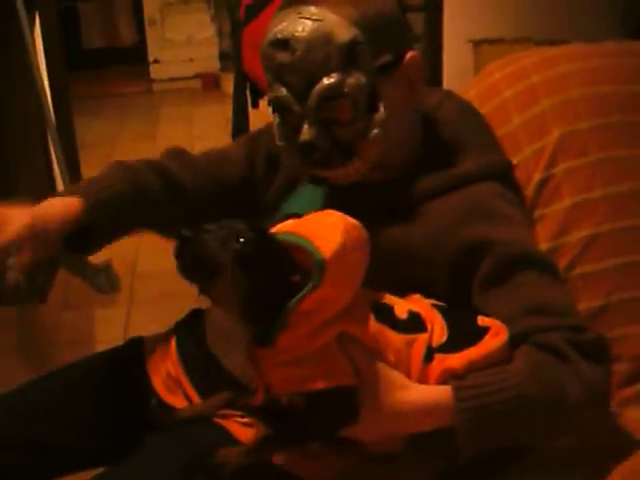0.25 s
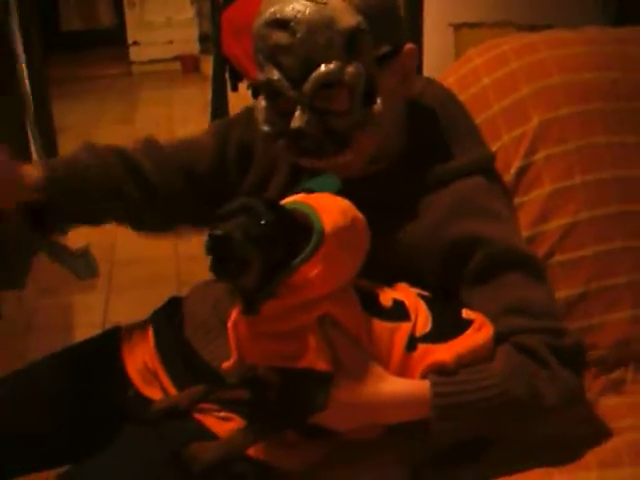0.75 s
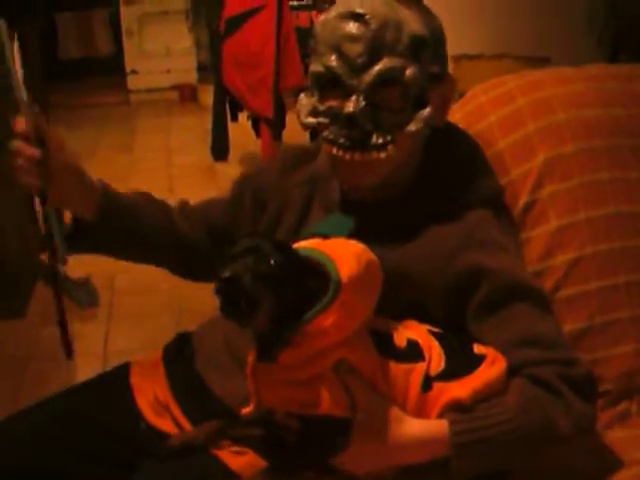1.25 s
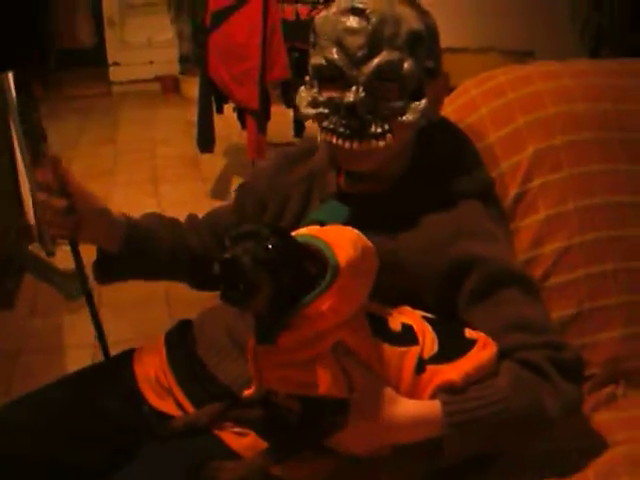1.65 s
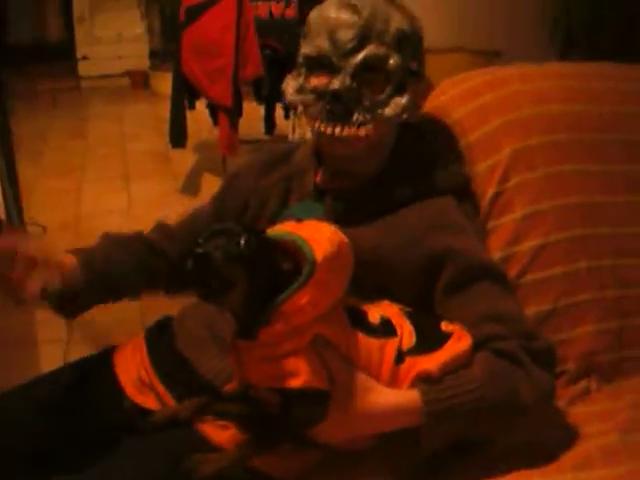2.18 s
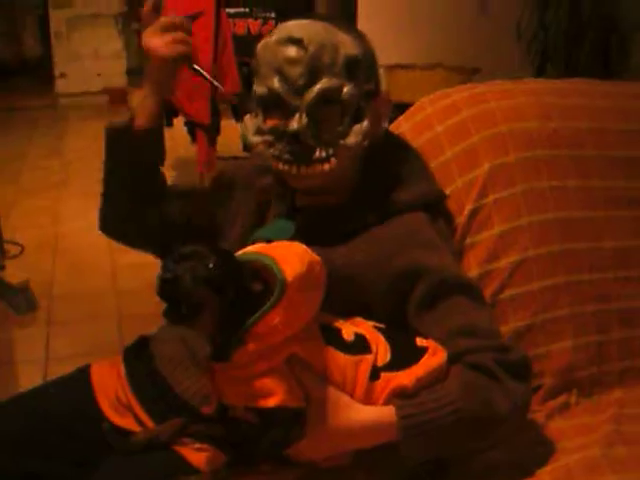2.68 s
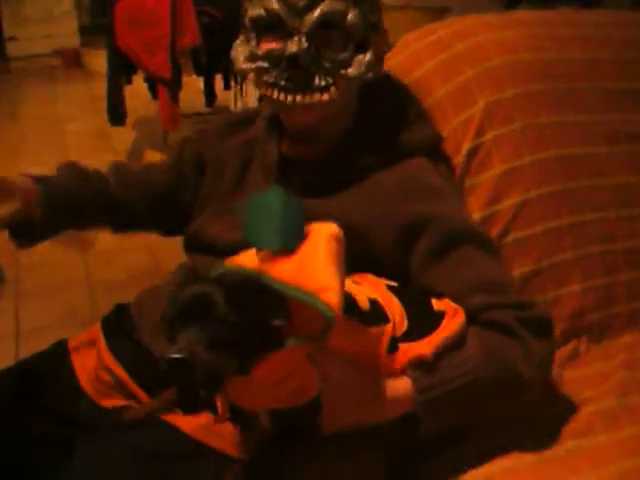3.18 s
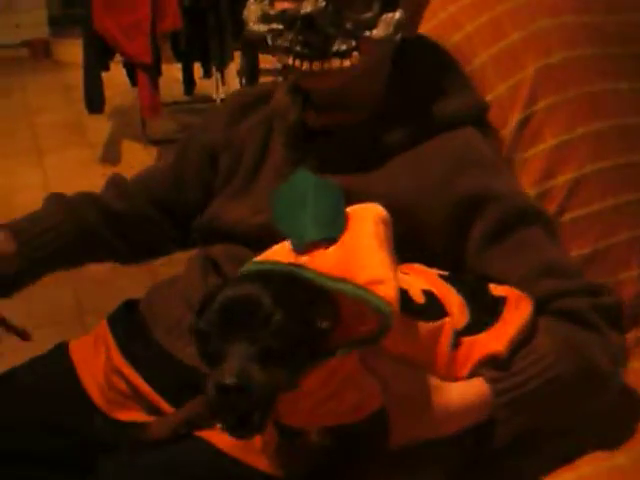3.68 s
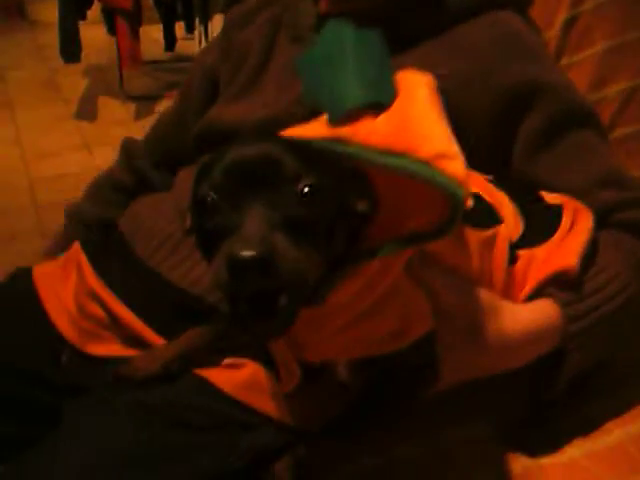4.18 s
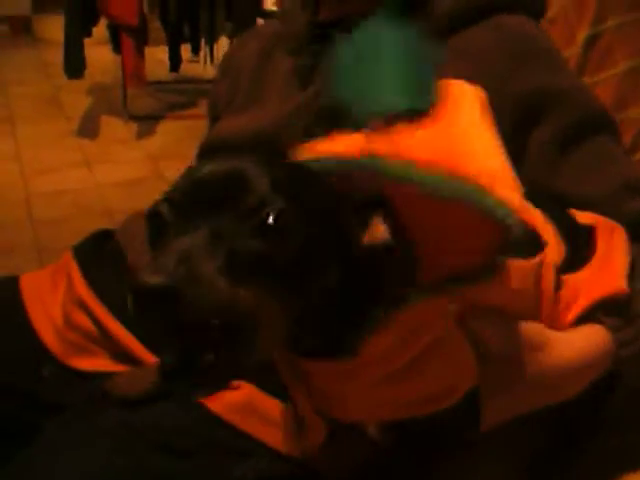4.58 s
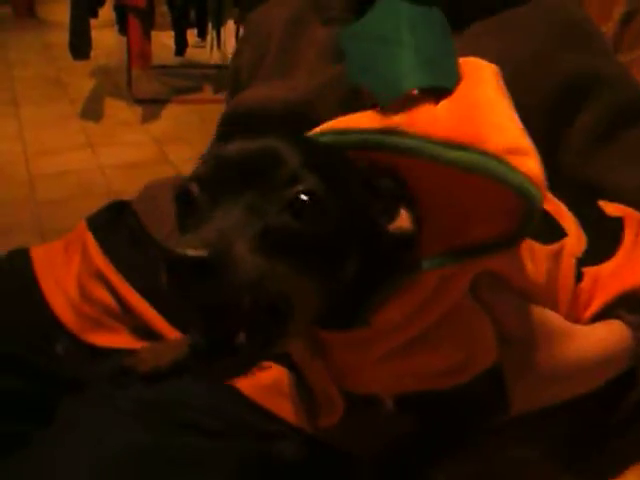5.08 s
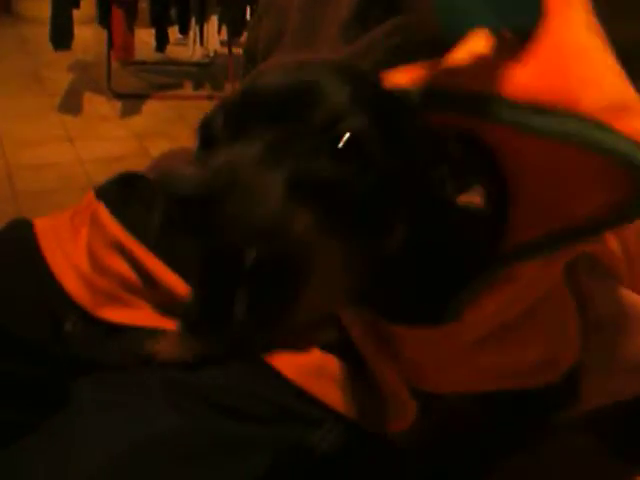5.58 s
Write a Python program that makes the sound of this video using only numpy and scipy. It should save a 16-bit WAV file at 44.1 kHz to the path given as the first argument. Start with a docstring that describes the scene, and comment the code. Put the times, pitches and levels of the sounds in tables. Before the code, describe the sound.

Close indoors, a small dog alternates rattling growls and rasping in-breath snarls, broken by short, slightly distorted barks and huffs.

```python
"""A small dog growling on a lap indoors.

Uneven vocal-fold pulses and turbulent air excite the resonances of throat and muzzle. Throbbing growls
on the out-breath alternate with raspy snarls on the in-breath, with snapping barks and huffs between.
The loudest crests overload a close, cheap microphone, which flattens and flips them into a crackle."""
import sys
import numpy as np
from scipy import signal
from scipy.fft import rfft, irfft, next_fast_len
from scipy.io import wavfile
from scipy.ndimage import uniform_filter1d

SR = 44100
rng = np.random.default_rng(int(sys.argv[2]) if len(sys.argv) > 2 else 0)


def store_wav(level_fs):
    """Save 16-bit WAV to argv[1]."""
    pcm = np.round(np.clip(np.atleast_2d(level_fs), -1, 1) * 32767)
    wavfile.write(sys.argv[1], SR, pcm.T.astype(np.int16))


N = 257536
TIME = np.arange(N) / SR


def amp(db):
    """Amplitude ratio of a level in decibels."""
    return 10 ** (np.asarray(db) / 20)


def unit_rms(x):
    """Normalisation to rms 1."""
    return x / np.sqrt(np.mean(x ** 2) + 1e-20)


def follow(rows, t):
    """Linear interpolation of each later column against the first."""
    knots, *columns = np.transpose(rows)
    return [np.interp(t, knots, column) for column in columns]


def add(mix, t, sound, fade=0.002):
    """Superposition: a sound joins the mix with tapered ends."""
    part = mix[max(round(t[0] * SR), 0):][:len(sound)]
    taper = np.clip(np.minimum(t - t[0], t[-1] - t) / fade, 0, 1)
    part += (sound * taper)[:len(part)]


def wander(t, hz):
    """Low-passed noise: smooth random motion of rms about 1."""
    f = np.fft.rfftfreq(N, 1 / SR)
    return unit_rms(irfft(rfft(rng.standard_normal(N)) / (1 + (f / hz) ** 4), N))[:len(t)]


def lowpass(x, hz, taps=511):
    """Zero-phase low-pass filtering."""
    return signal.oaconvolve(x, signal.firwin(taps, hz, window=("kaiser", 8), fs=SR), "same")


def envelope(x, window):
    """Magnitude of the analytic signal, averaged over a window of samples."""
    analytic = signal.hilbert(x, next_fast_len(len(x)))[:len(x)]
    return uniform_filter1d(abs(analytic), window) + 1e-6


def resonate(x, hz, width):
    """Forced response of a steep resonance whose frequency may move; rms 1."""
    carrier = np.exp(2j * np.pi * np.cumsum(hz * np.ones(len(x))) / SR)
    pole = np.exp(-np.pi * width / SR)
    return unit_rms((carrier * signal.lfilter([1], [1, -2 * pole, pole * pole], x / carrier)).real)


def ring(x, modes):
    """Modal sum: fixed resonances driven in parallel."""
    return sum(amp(db) * resonate(x, hz, width) for hz, width, db in modes)


def sing(t, hz, waver):
    """Random frequency modulation: a hard-driven resonance sounds as an unsteady tone."""
    return unit_rms(np.sin(2 * np.pi * np.cumsum(hz * (1 + waver * wander(t, 72.1))) / SR))


def steadied(x, amount, window):
    """Compression: saturating tissue holds the swing of a vibration nearer one size."""
    return unit_rms(x / envelope(x, window) ** amount)


def folds(t, hz, jitter, rough, puff=0.83):
    """Glottal source: uneven closures of the vocal folds, each with a puff of turbulent air."""
    cycles = np.cumsum(hz * np.exp(jitter * wander(t, 110))) / SR
    pulses = np.diff(np.floor(cycles), prepend=0)
    air = np.exp(-(cycles % 1) / puff) * rng.standard_normal(N)[:len(t)]
    return (1 - rough) * unit_rms(pulses - pulses.mean()) + rough * unit_rms(air)


# Low and high tract resonances. Each row: frequency in Hz, width in Hz, relative level in dB.
SNARL_BODY_MODES = [(268, 140, -20), (694, 120, -14.5), (1310, 380, -10)]
SNARL_RASP_MODES = [(2312, 450, -18), (2623, 513, 0), (3016, 600, -2.5), (3470, 465, -6.5),
                    (3746, 390, -10)]
# Snarls. Each row: start, attack, length and release in seconds, effort and rasp in dB,
# first resonance in Hz.
SNARL_BREATHS = [(0.0, 0.00068, 0.092, 0.089, -13, -15.5, 1157), (3.055, .05, 0.48, 0.12, -16, -16, 1171),
                 (4.655, 0.0052, 0.6785, 0.1, -14, -15.5, 1166), (5.615, 0.02, 0.31, .05, -13.5, -16, 1161)]


def snarl(start, attack, length, release, effort_db, rasp_db, first_hz, sag_hz_per_s=80):
    """Source and filter: a rattling in-breath past bared teeth, coloured by quivering lips."""
    t = np.arange(start, start + length, 1 / SR)
    onset = amp(-8 * np.maximum(1 - (t - start) / attack, 0))
    dying = np.maximum(1 - (t[-1] - t) / release, 0)
    drive = folds(t, hz=191, jitter=0.35, rough=0.71, puff=0.72)
    lips = 1 + 0.014 * wander(t, 12)
    first = resonate(drive, first_hz - sag_hz_per_s * (t - start), 180)
    body = amp(-1.44) * steadied(first, amount=0.25, window=500) + ring(drive, SNARL_BODY_MODES)
    rasp = sum(amp(db) * resonate(drive, hz * lips, width) for hz, width, db in SNARL_RASP_MODES)
    rasp = steadied(rasp, amount=0.9, window=900)
    voice = amp(effort_db - 19 * dying) * body + amp(rasp_db - 21 * dying) * rasp
    flutter = unit_rms(amp(1.3 * wander(t, 70)))
    return t, onset * voice * flutter


# Open-mouth resonances. Each row: frequency in Hz, width in Hz, relative level in dB.
BARK_MODES = [(1495, 664, 2), (2043, 335, 0), (2844, 1100, -0.5), (3400, 900, -13.5)]
# Barks. Each row: start, rise and length in seconds, level and its change over the length in dB,
# first resonance in Hz, brightness in dB.
BARKS = [(0.081, 0.0059, 0.14, 0, -1, 1175, -1.5), (0.521, 0.0026, 0.055, -18, -2.5, 976, -13.5),
         (0.772, 0.0013, 0.088, 0.5, -8, 957, -11.5), (2.802, 0.055, .12, 2, -9, 1180, -3),
         (3.509, 0.0054, 0.031, -6, -5, 1100, -6), (3.541, 0.0048, 0.1104, 1.5, -4.5, 1068, -7),
         (4.338, 0.051, 0.14, -3, -4, 1138, 1.5), (4.657, 0.004, 0.062, -9.5, 1.5, 1152, 4),
         (5.332, 0.001, 0.14, 1.5, -3, 1202, -2.5), (5.61, 0.017, 0.087, -3.5, -9, 1234, -6.5)]


def bark(start, rise, length, db, change_db, first_hz, bright_db, release=0.03):
    """Transient excitation: a hoarse burst drives the broad resonances of a mouth thrown open."""
    t = np.arange(start, start + length, 1 / SR)
    drive = folds(t, hz=268.7, jitter=0.3, rough=0.732, puff=0.43)
    voice = resonate(drive, first_hz, 340) + amp(bright_db) * ring(drive, BARK_MODES)
    voice = steadied(voice, amount=0.76, window=400)
    shape = np.minimum((t - start) / rise, 1) * np.minimum((t[-1] - t) / min(release, length / 2), 1)
    return t, amp(db + change_db * (t - start) / length) * shape * voice


# Low tract resonances. Each row: frequency in Hz, width in Hz, relative level in dB.
HUFF_MODES = [(288, 160, -34), (830, 190, -8)]
# Huffs. Each row: start and length in seconds, effort and level change over the length in dB,
# first resonance in Hz, levels of the second resonance and the hiss in dB.
HUFF_BREATHS = [(0.216, 0.35, -26, -19.5, 1154, -22.5, -29), (0.514, 0.3, -36.5, -33, 973, -38, -27.5),
                (2.985, 0.088, -26.5, -0.5, 1120, -24.5, -36.5), (4.544, .115, -29, 2, 1062, -30.5, -31.5),
                (5.457, 0.2, -28, -2.5, 1200, -27.5, -25)]


def huff(start, length, effort_db, change_db, first_hz, second_db, hiss_db):
    """Turbulence noise: breath filtered by the open muzzle, mostly fading as the air runs out."""
    t = np.arange(start, start + length, 1 / SR)
    air = rng.standard_normal(N)[:len(t)] * amp(1.1 * wander(t, 120))
    thin_air = signal.sosfilt(signal.butter(1, 800, "high", fs=SR, output="sos"), air)
    body = amp(2) * resonate(thin_air, first_hz, 330) + ring(air, HUFF_MODES)
    second = resonate(thin_air, 1964, 540)
    hiss = resonate(thin_air, 2690, 1300) + amp(-18.5) * resonate(thin_air, 3550, 950)
    shape = amp(change_db * ((t - start) / length) ** 2.25)
    return t, shape * (amp(effort_db) * body + amp(second_db) * second + amp(hiss_db) * hiss)


# Evenness of the throb. Each row: time in seconds, regularity from 0 to 1.
THROB_REGULARITY = [(0.92, 0), (1.02, 0.81), (1.33, 0.23), (1.45, 0.2), (2.52, 0.21), (2.64, 0.91),
                    (2.8, 0.11)]


def tissue_throb(t, rate_hz=26.3, crest_s=1.005):
    """Amplitude modulation by loose throat tissue, part periodic, part random: gain and regularity."""
    regular = np.clip(follow(THROB_REGULARITY, t)[0], 0, 1)
    periodic_db = 8.5 * np.cos(2 * np.pi * rate_hz * (t - crest_s))
    random_db = 6.5 * wander(t, 65)
    throb = amp(regular * periodic_db + (1 - regular) * random_db)
    throb /= np.sqrt(uniform_filter1d(throb ** 2, size=3400))
    return 2.11 * np.tanh(throb / 2.23), regular  # the tissue can swing only so far


# Fixed resonances of chest, throat and muzzle. Each row: frequency in Hz, width in Hz,
# relative level in dB.
GROWL_BODY_MODES = [(590, 120, -27), (740, 110, -16), (1230, 220, -17)]
GROWL_UPPER_MODES = [(2670, 680, -30)]
# Throat and mouth shape, one curve a growl. Each row: time in seconds, first three resonances in Hz.
FORMANT_PATHS = [
    [(0.87, 998.7, 1630, 2580), (0.94, 921, 1672, 2650), (1.2, 897.8, 1642, 2590),
     (1.532, 986.4, 1711, 2746), (1.64, 948.8, 1707, 2740), (2.108, 974.3, 1796, 2845),
     (2.156, 1029, 1823, 2910), (2.564, 947.5, 1760, 2966), (2.82, 997.6, 1800, 2780)],
    [(3.64, 1064, 2005, 3020), (3.688, 1050, 2016, 3100), (3.75, 1043, 1926, 2920),
     (4.21, 987.3, 1909, 2900), (4.44, 1150, 2000, 2890)],
]
# Growls, each swelling into a bark. Each row: start, build-up, swell and climax time in seconds,
# effort and brightness in dB, pitch in Hz when the first resonance lies at 1000 Hz.
GROWL_BREATHS = [(0.8, 0.15, 0.1, 2.84, -11.5, -7, 277.2), (3.55, 0.081, 0.15, 4.385, -12.5, -4.5, 243.3)]


def growl(start, build, swell, climax, level_db, bright_db, base_hz, formants, open_s=0.16, tail_s=0.17):
    """Modulated formants: on an out-breath through a nearly shut mouth, the lowest two almost sing."""
    t = np.arange(start, climax + tail_s, 1 / SR)
    stages = [start, start + build, climax - swell, climax, climax + open_s]
    effort_db = level_db + np.interp(t, stages, [-2, 0, 0, 4.5, -15])
    opened = np.clip((t - climax) / open_s, 0, 1)
    first_hz, second_hz, third_hz = follow(formants, t)
    pitch_hz = base_hz * (first_hz / 1000) ** 1.7  # a tighter throat raises both
    drive = folds(t, pitch_hz, jitter=0.085, rough=0.48 - 0.05 * opened)
    throb, regular = tissue_throb(t)
    bend = 1 + 0.028 * (throb - 1)  # each throb bends the singing formants upward
    first = sing(t, first_hz * bend, waver=0.029) + 0.75 * resonate(drive, first_hz * bend, 170)
    first = steadied(first, amount=0.6, window=300)
    second = 0.5 * sing(t, second_hz * bend, waver=0.019) + 0.88 * resonate(drive, second_hz, 240)
    third = amp(-4.5) * resonate(drive, third_hz, 380)
    fourth = amp(-13) * resonate(drive, third_hz + 724, 290)
    upper = steadied(second + third + fourth + ring(drive, GROWL_UPPER_MODES), amount=0.23, window=700)
    upper *= amp(bright_db - 6.5 * regular + 11 * opened)  # darker when even, brighter when open
    chest = amp(-20.5) * (0.74 * sing(t, pitch_hz, waver=0.07) + 0.67 * resonate(drive, pitch_hz, 130))
    voice = first * throb + (chest + ring(drive, GROWL_BODY_MODES) + upper) * throb ** 0.54
    return t, amp(effort_db) * voice


# The hardest single throbs. Each row: time in seconds, peak of the low band in dB.
HARD_THROBS = [(.969, 2), (.992, 2.5), (1.081, 1.5), (1.236, 0.8), (1.347, 0.5), (1.445, 1.5), (1.595, 1.5),
               (1.635, 1.5), (1.66, 1.7), (1.785, 2.6), (1.841, 0.5), (1.959, 0.9), (2.096, -0.5),
               (2.232, 0), (2.26, -0.5), (2.31, 0), (2.383, 1), (3.326, -3.5), (3.438, -14), (3.517, 6.5),
               (3.68, 4), (4.06, .5), (4.079, 2), (4.294, 3), (4.334, 1.5), (4.686, 5.5), (4.842, -1.5),
               (5.18, 1.7), (5.626, 3), (5.676, 2.5), (5.745, 0.5), (5.783, 2)]


def surge(voice, width_s=0.002, chance_per_s=3, lesser_db=-7.5, loud_db=-15.5):
    """Gaussian gain pulses lift the first-resonance band at set times, and by chance while it is loud."""
    low_band = lowpass(voice, 1400)
    size = envelope(low_band, window=40)
    by_chance = (rng.random(N) < chance_per_s / SR) & (size > amp(loud_db))
    swell = np.zeros(N)
    for s, db in HARD_THROBS + [(s, lesser_db) for s in TIME[by_chance]]:
        near = abs(TIME - s) < 5 * width_s
        pulse = np.exp(-((TIME[near] - s) / width_s) ** 2)
        swell[near] = np.maximum(swell[near], pulse * (amp(db) / size[near] - 1))
    return voice + swell * low_band


# Jaw closings after the bark that ends a growl. Each row: time in seconds, level in dB.
JAW_CLOSINGS = [(2.906, -19), (4.463, -16)]
# Whines within each closing. Each row: delay and length in seconds, first and last frequency in Hz,
# relative level in dB.
WHINE_GLIDES = [(-.02, .04, 3140, 2657, -3.5), (0, 0.058, 784.6, 653, -10), (.008, .036, 1780, 1983, -0.5),
                (0.037, .048, 870, 1180, -2), (0.034, 0.039, 2600, 2930, -1.5)]


def whine(start, length, from_hz, to_hz, db):
    """Formant glide: as the jaw moves, one resonance rings clear and slides."""
    t = np.arange(start, start + length, 1 / SR)
    tone = sing(t, np.linspace(from_hz, to_hz, len(t)), waver=0.035)
    return t, amp(db + wander(t, 200)) * tone


def muzzle(x, bass_hz=190, notch_hz=410, notch_depth=0.21):
    """Radiation and antiresonance: a small mouth sheds little bass, and the nose absorbs one band."""
    x = signal.sosfilt(signal.butter(4, bass_hz, "high", fs=SR, output="sos"), x)
    notched = signal.lfilter(*signal.iirnotch(notch_hz, Q=2.5, fs=SR), x)
    return x + notch_depth * (notched - x)


# Decay of a furnished room. Each row: frequency in Hz, time to fall 60 dB in seconds.
REVERB_TIMES = [(200, 0.1), (1000, 0.3), (4000, 0.1)]


def room(x, wet_db=-13.5, echoes_per_s=2000):
    """Reverberation: sparse reflections whose treble and bass die before the middle."""
    n = SR // 2
    echoes = rng.standard_normal(n) * (rng.random(n) < echoes_per_s / SR) * (TIME[:n] > 0.004)
    hz, t, spectrum = signal.stft(echoes, SR, nperseg=256)
    decay = amp(-60 * t / follow(REVERB_TIMES, hz)[0][:, None])
    tail = signal.istft(spectrum * decay, SR, nperseg=256)[1]
    return x + amp(wet_db) * signal.fftconvolve(x, tail / np.linalg.norm(tail))[:N]


def room_noise(hiss_db=-52, rumble_db=-67):
    """Noise floor: the faint hiss and low rumble of a still room."""
    hiss = resonate(rng.standard_normal(N), 1600, 2000)
    return amp(hiss_db) * hiss + amp(rumble_db) * wander(TIME, 100)


def scene():
    """Superposition: the dog's calls radiate from the muzzle into the room, over its noise floor."""
    dog = np.zeros(N)
    for row, formants in zip(GROWL_BREATHS, FORMANT_PATHS):
        add(dog, *growl(*row, formants))
    for row in SNARL_BREATHS:
        add(dog, *snarl(*row))
    for row in HUFF_BREATHS:
        add(dog, *huff(*row))
    for row in BARKS:
        add(dog, *bark(*row), fade=0.00033)
    for s, level_db in JAW_CLOSINGS:
        for delay, length, from_hz, to_hz, db in WHINE_GLIDES:
            add(dog, *whine(s + delay, length, from_hz, to_hz, level_db + db), fade=0.0029)
    return (surge(room(muzzle(dog))) + room_noise())[None]


def record(dry, rail=0.72, flip_level=1.2, recovery_s=0.000077, band_hz=4130, edge_hz=16000):
    """Overload distortion: a narrow-band input stage saturates, flips on high crests, then clips."""
    x = dry[0]
    # too high a crest falls to the lower rail and sticks there for a moment
    overload = (1 + np.tanh((x - flip_level) / 0.1)) / 2
    hold = np.exp(-1 / (recovery_s * SR))
    flipped = np.tanh(1.35 * signal.lfilter([1 - hold], [1, -hold], overload))
    saturated = x / (1 + (x / rail) ** 4) ** (1 / 4)
    # the narrow band rounds the clicks; only the last clip reaches above it
    narrow = lowpass(saturated * (1 - flipped) - rail * flipped, band_hz, taps=171)
    return lowpass(np.clip(narrow, -0.68, 0.68), edge_hz)[None]


dry = scene()
out = record(dry)
store_wav(out)
```